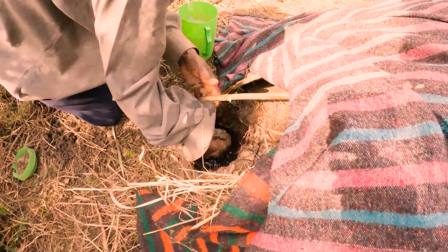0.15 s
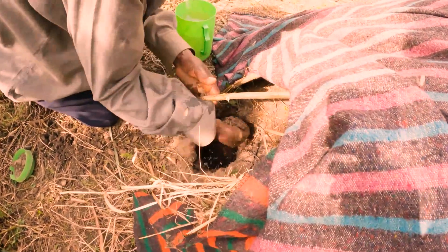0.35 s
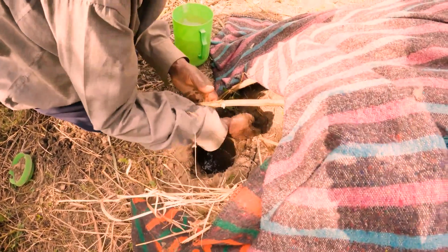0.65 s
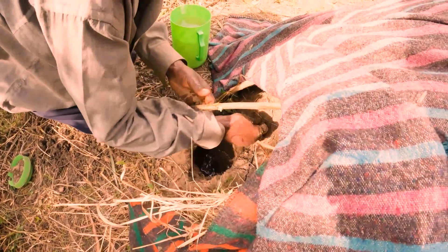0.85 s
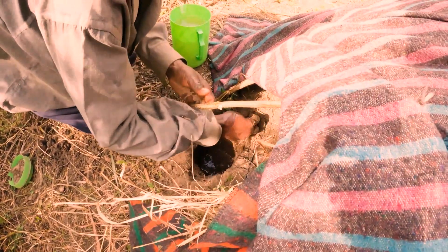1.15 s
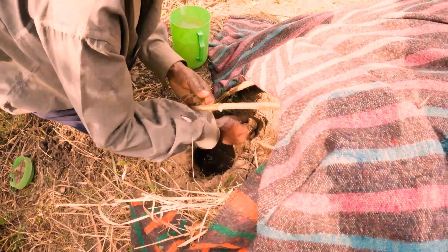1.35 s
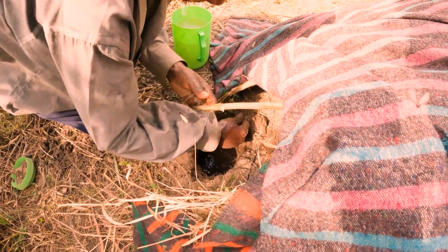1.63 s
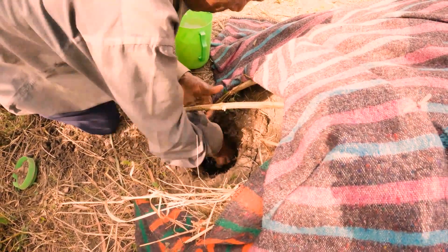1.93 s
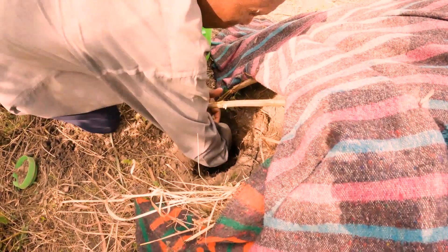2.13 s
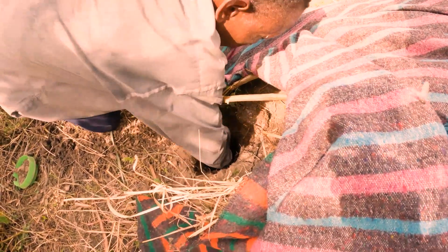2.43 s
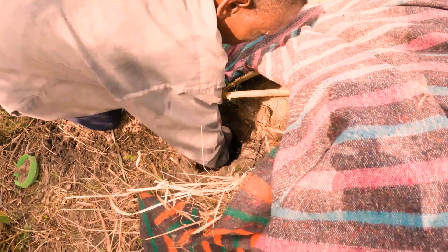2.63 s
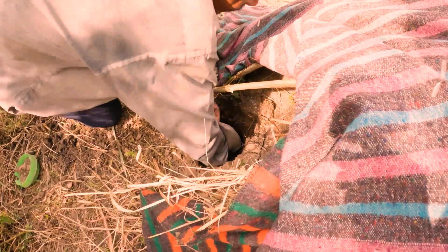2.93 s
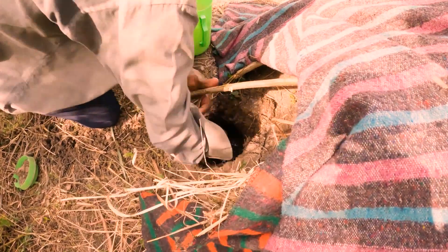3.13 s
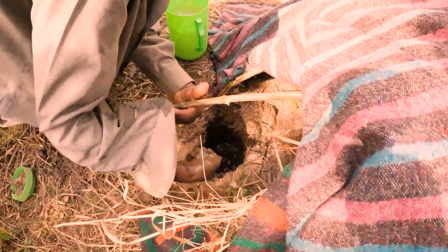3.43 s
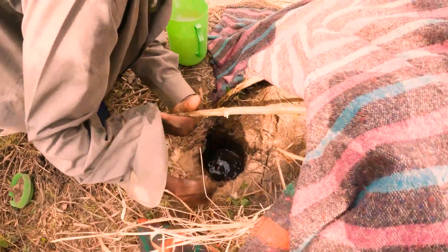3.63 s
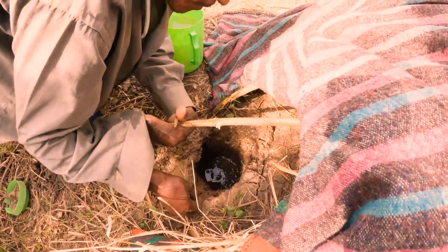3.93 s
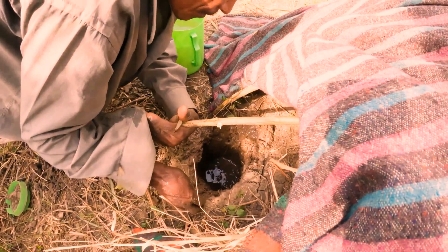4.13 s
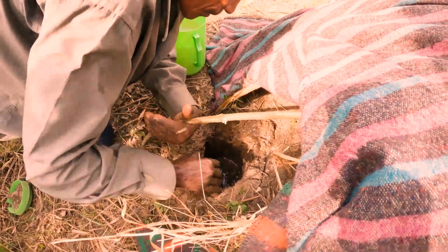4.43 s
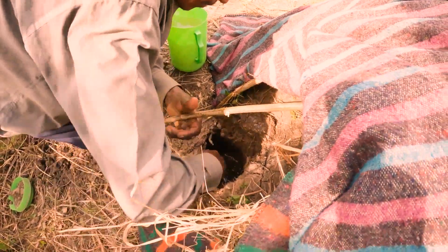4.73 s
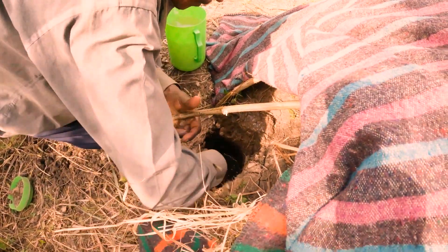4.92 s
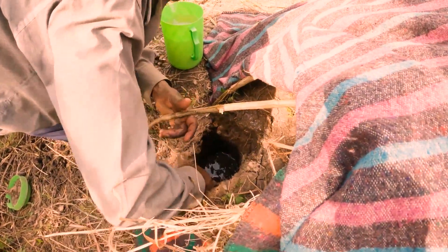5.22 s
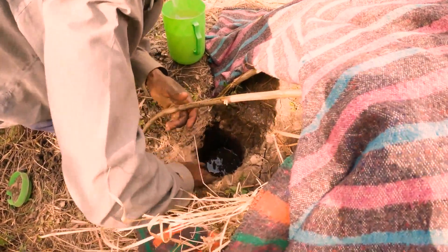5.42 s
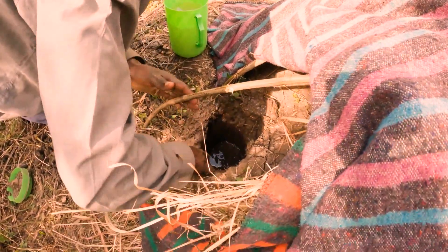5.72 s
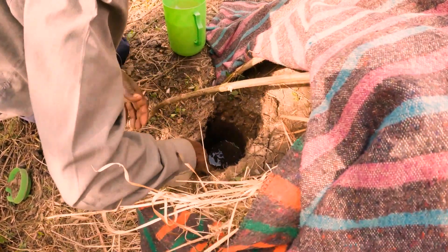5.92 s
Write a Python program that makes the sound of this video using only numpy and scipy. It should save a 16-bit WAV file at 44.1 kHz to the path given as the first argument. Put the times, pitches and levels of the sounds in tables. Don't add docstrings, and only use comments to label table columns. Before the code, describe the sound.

A close cricket trills in quiet dry grassland while small birds chirp, a hand scrapes and plops in a mud hole, and wind starts booming.

```python
import sys
import numpy as np
from scipy import signal
from scipy.fft import rfft, irfft, next_fast_len
from scipy.io import wavfile
from scipy.ndimage import uniform_filter1d, map_coordinates

SR = 44100
rng = np.random.default_rng(int(sys.argv[2]) if len(sys.argv) > 2 else 0)


def rack_gain(trim_db):
    fader = np.asarray(trim_db, float)
    return 10 ** (fader / 20)


def waveform_to_disk(signal):
    frames = np.transpose(np.atleast_2d(signal))
    scaled = np.clip(frames, -1, 1) * 32767
    samples = np.round(scaled).astype(np.int16)
    wavfile.write(sys.argv[1], SR, samples)


N = 267642
T = np.arange(N) / SR

# (time [s], peak level [dB], boom pitch [Hz])
PUFFS = [(.22, -51.5, 45.7), (.45, -60, 33.1), (.67, -54.5, 44.5), (.86, -53, 38), (1.03, -49, 37.7),
         (1.19, -45.5, 58.2), (1.33, -52, 33.6), (1.529, -46.5, 50.3), (1.88, -47.5, 63.9),
         (2.21, -47, 56.24), (2.44, -57, 41.8), (2.56, -45, 62.4), (2.77, -52, 61), (2.9, -45, 58.9),
         (3.01, -50.5, 45.6), (3.161, -46, 47.7), (3.25, -44, 58.24), (3.36, -45.5, 53.96),
         (3.48, -45, 36.8)]
# (time [s], peak level [dB], boom pitch [Hz], fall [dB/s])
GUSTS = [(3.55, -45.5, 43, 37), (3.86, -42, 50.2, 20), (3.93, -32.5, 56.9, 32), (4.04, -36, 53.94, 120),
         (4.16, -32, 49.5, 404), (4.26, -36, 45.85, 332), (4.36, -43, 50.28, 130), (4.59, -44, 63.9, 22),
         (4.68, -32, 55.95, 92), (4.81, -35, 48.6, 278), (4.97, -30, 54.87, 12), (5.05, -31, 55.2, 70),
         (5.165, -32.5, 55.16, 255), (5.225, -35.5, 62.2, 250), (5.285, -31, 52.04, 450),
         (5.41, -34, 43, 300), (5.475, -31, 45.04, 231.5), (5.58, -36.5, 46.4, 105), (5.74, -36, 43.8, 297),
         (5.82, -29.5, 45.9, 350), (5.9, -32.5, 42.7, 236.5), (6.01, -33.5, 42.2, 88)]
# (time [s], level [dB])
AIR_LEVEL = [(0.0, -62.5), (0.47, -61.5), (1.39, -63), (2.1, -61), (2.69, -62), (3.57, -61.5),
             (4.19, -64.5), (4.56, -63.5), (5.6, -63.5), (6.07, -66)]
# (frequency [Hz], density [dB per Hz])
DRONE_COLOUR = [(60, -41), (100, -20), (135, -2.5), (190, -1.5), (300, -8), (500, -19), (850, -30.5),
                (1200, -81)]
# (frequency [Hz], density [dB per Hz])
GRASS_COLOUR = [(350, -22), (600, -6), (850, -8), (1070, 0), (1400, 0.5), (2300, -6.5), (3700, -13),
                (5900, -3), (7010, -3.5), (8130, -22.5), (9000, -21), (11700, -25), (19800, -120)]
# (frequency [Hz], left-right likeness [0-1])
LIKENESS = [(60, 0.19), (180, 0.73), (550, 0.45), (1650, 0.49), (4970, 0.55), (15000, 0.37)]
# (frequency [Hz], left minus right [dB])
BALANCE = [(60, 0), (240, -5), (950, 0.0), (3770, 1.5), (15000, 2.5)]
# (time [s], peak level [dB], fall [dB/s])
CLOTH_MOVES = [(0.0, -70, 67), (.43, -75, 200), (.58, -70.5, 25), (1.25, -72.5, 28), (1.5, -72.5, 93),
               (1.89, -75, 95), (2.41, -71, 128), (2.63, -78.5, 1), (3.5, -74.5, 4), (3.81, -71, 21),
               (4.835, -60.5, 80), (5.15, -66, 52), (5.55, -66.5, 87), (5.71, -68.5, 39)]
# (frequency [Hz], density [dB per Hz])
CLOTH_COLOUR = [(900, -32), (3500, -7.5), (7000, -3), (10000, -7.5), (12000, -2.5), (14000, -5.5),
                (15600, -37)]
# (time [s], peak level [dB], fall [dB/s])
LEAF_STIRS = [(.05, -56.5, 10), (.42, -58.5, 20), (.8, -67, 25), (1.15, -71.5, 50), (1.68, -61.5, 28),
              (1.85, -60.5, 9), (2.26, -62, 30), (2.72, -65.5, 4), (3.05, -60.5, 16), (3.6, -69, 13),
              (4.3, -72.5, 6.5), (5.1, -66, 19), (5.3, -71, 90), (5.6, -70, 15), (5.8, -71, 40)]
# (frequency [Hz], density [dB per Hz])
LEAF_COLOUR = [(1500, -19), (2300, -3), (2900, -1.5), (4200, -6), (5300, -21)]
# (time [s], peak level [dB], fall [dB/s])
DIG_STROKES = [
    (.56, -55, 105),
    (.74, -56, 72),
    (2.14, -59.5, 77),
    (2.42, -58, 200),
    (2.61, -57.5, 170),
    (2.805, -61, 170),
    (3.11, -55, 130),
    (5.28, -63, 31),
    (5.72, -63, 40),
]
# (frequency [Hz], density [dB per Hz])
CRUMB_COLOUR = [(400, -25), (800, -2.5), (1400, 4), (2800, 0.5), (5000, -7), (9000, -30)]
# (time [s], level [dB])
CHORUS_LEVEL = [(0.0, -60), (0.76, -76), (1.54, -66), (1.94, -65), (2.51, -62), (2.97, -68), (3.63, -61.5),
                (5.34, -74), (6.07, -69)]
# (frequency [Hz], width [Hz], level [dB])
CHORUS_BANDS = [(5040, 150, -81), (5530, 51, -79.5), (5720, 47, -76.5), (5600, 440, -89),
                (6600, 150, -78.5), (6980, 170, -77)]
# (start [s], end [s], first level [dB], last level [dB])
CRICKET_TRILLS = [
    (0, 0.224, -60, -60),
    (0.94, 2.566, -57, -55.5),
    (3.292, 4.84, -60.5, -61),
    (5.556, 6.068, -64.5, -64.5),
]
# (time of one stroke [s], rate [strokes/s], pitch [Hz])
WING_STROKES = [(.015, 38.3, 7000), (1.011, 38.19, 7020), (3.3456, 38.22, 6990), (5.598, 38.1, 6960)]
# (nearest time [s], level [dB], fall [dB/s])
FLY_PASS = [
    (.45, -57.5, 11.5),
]
# (time [s], length [s], first pitch [Hz], last pitch [Hz], level [dB])
SWEEPS = [(0.163, 0.12, 3030, 2890, -62), (0.78, 0.037, 5040, 3800, -65), (1.01, 0.014, 5460, 3570, -53),
          (1.044, 0.021, 3130, 2720, -58.5), (1.889, 0.034, 7050, 8040, -56),
          (2.741, 0.04, 4600, 2243, -56), (2.85, 0.032, 4397, 2618, -57), (2.948, 0.038, 4300, 2492, -56),
          (3.055, 0.01, 4340, 3540, -50.5), (3.068, 0.02, 3870, 2620, -53),
          (3.13, 0.016, 5800, 5720, -50.5), (3.149, 0.0076, 5700, 5700, -50),
          (3.164, 0.012, 5740, 5760, -50), (3.42, 0.025, 7180, 8050, -63), (3.726, 0.0278, 3640, 4066, -63),
          (3.798, 0.049, 4076, 4260, -58.5), (5.421, 0.063, 2810, 2230, -67.5),
          (5.576, 0.023, 1180, 1342, -59), (2.864, .035, 4460, 4380, -62), (1.28, .025, 5500, 5450, -67),
          (5.771, .05, 2786, 2505, -74), (5.554, 0.02, 5100, 4945, -60), (5.73, 0.038, 4223, 3930, -64),
          (3.234, 0.015, 1320, 1210, -53.5), (5.702, 0.024, 1117, 981, -62),
          (5.733, 0.025, 1155, 954, -58.5), (5.78, 0.032, 1118, 978, -63.5),
          (0.032, 0.027, 3330, 4410, -58)]
# (time [s], upper voice level [dB], lower voice level [dB], last pitch [Hz])
CHIPS = [(0.243, -62, -58, 5800), (.447, -62, -61, 5420), (0.777, -69, -65, 5600), (.955, -67, -62, 5300),
         (1.239, -67, -69, 5480), (1.408, -63, -57.5, 5390), (1.588, -69, -58, 5180),
         (1.77, -71, -64, 5180), (1.955, -72, -67, 5300)]
# (time after start [s], pitch [Hz])
CHIP_UPPER = [(0, 7750), (.012, 7900), (.028, 7650), (.048, 6600)]
# (time after start [s], share of the fall from 6.6 kHz [0-1])
CHIP_LOWER = [(0, 0), (.02, .05), (.045, .95), (.058, 1)]
# (time [s], length [s], first pitch [Hz], last pitch [Hz], peak level [dB])
SLIDES = [
    (1.755, .235, 5400, 4350, -63),
    (2.733, .127, 5070, 4500, -57),
    (4.105, .285, 5490, 4340, -65.5),
]
# (share of length [0-1], share of fall [0-1], level [dB])
SLIDE_SHAPE = [(0, 0, -5), (.15, .14, -1), (.45, .44, -1), (.78, .89, 0), (1, 1, -5)]
# (time [s], length [s], first pitch [Hz], last pitch [Hz], peak level [dB])
HELD = [(2.07, .1, 5720, 5540, -63), (2.215, .085, 6080, 6000, -53), (2.295, .09, 6000, 5960, -52.5),
        (2.99, .115, 5260, 5240, -49.5), (3.103, .05, 5240, 5250, -54), (4.47, .112, 5590, 5480, -53.5),
        (4.607, .128, 6040, 5900, -50), (4.738, .044, 5900, 5870, -50)]
# (time [s], pitch [Hz], level [dB])
RISE = [
    [(2.5, 6700, -65), (2.58, 6700, -52), (2.64, 6760, -64), (2.74, 7130, -60), (2.79, 7330, -58),
     (2.83, 7400, -70)],
]
# (time [s], pitch [Hz], level [dB], length [s])
TRILL = [(3.088, 4400, -46, 0.0046), (3.105, 4270, -53, .005), (3.113, 4514, -52, .005),
         (3.123, 4440, -47.5, .006), (3.13, 4500, -51, .005), (3.144, 4370, -54.5, .006),
         (3.157, 4500, -50, .005), (3.162, 4450, -63, .005), (3.183, 4270, -53, .006),
         (3.196, 4560, -44, .005), (3.219, 4420, -43, 0.0051), (3.228, 4510, -41, 0.012),
         (3.246, 4497, -39.5, 0.011), (3.263, 4474, -41, 0.0155), (3.278, 4437, -42.5, 0.0099),
         (3.291, 3510, -50, 0.0091), (3.179, 5200, -43, .005), (3.198, 5340, -54, .006),
         (3.203, 5600, -49, .007), (3.212, 5320, -43, 0.0091), (3.224, 5320, -52, 0.0086),
         (3.239, 5300, -46, 0.0093), (3.258, 5200, -52, .007), (3.285, 5100, -54, 0.0067)]
# (share of length [0-1], share of pitch added, level [dB])
TRILL_SHAPE = [(0, .06, -8), (.42, 0, 0), (.74, -.05, -4), (1, -.19, -18)]
# (time [s], top band peak level [dB])
FLECKS = [(.028, -47), (.064, -49), (.104, -48), (.179, -51), (.257, -52), (.298, -57), (.54, -46),
          (.894, -51), (1.107, -54), (1.207, -52), (1.242, -54), (1.255, -54), (1.322, -50), (1.361, -49),
          (1.543, -52), (1.571, -56), (1.868, -57), (2.381, -54), (2.386, -51), (2.392, -54), (2.427, -53),
          (2.433, -55), (2.605, -52), (2.641, -52), (2.805, -51), (3.139, -54), (3.185, -55), (3.195, -56),
          (3.255, -53), (3.358, -51), (3.481, -50), (3.662, -54), (3.781, -51), (3.875, -61), (3.913, -55),
          (3.944, -55), (3.964, -55), (4.0, -54), (4.369, -54), (4.421, -56), (4.706, -51), (4.716, -50),
          (4.749, -52), (4.781, -52), (4.976, -50), (5.117, -51), (5.131, -50), (5.322, -50), (5.523, -46),
          (5.687, -43), (5.829, -56), (5.945, -55)]
# (time [s], top band peak level [dB], middle over top [dB], bottom over top [dB])
SNAPS = [(0.0722, -45, -5, -19), (0.208, -49.5, 0, -14), (0.291, -57, 8, -12), (0.4026, -53, 6, -11),
         (0.4186, -48.5, -1, -11), (0.464, -48, -2, 4), (0.532, -42, -2, -6), (0.568, -46, 3, -4),
         (0.595, -51, 4.5, 7), (0.703, -58.5, 0, 23), (1.011, -51.5, -6, 6), (2.1474, -60, 5, 20.5),
         (2.3986, -55.5, 8, 11), (2.6123, -49.5, 7, 2), (2.597, -59, 2, 20), (2.6302, -34.5, -21, -4),
         (3.043, -61, 13, 19), (3.109, -59, 13, 12), (3.5006, -40.5, 0, 3), (3.529, -51, 0, 5),
         (3.548, -37, -5, -2), (3.813, -46, -1, -8), (3.807, -51, 0, -9), (4.24, -63.5, 12, 2),
         (2.463, -64, 3, 21.5), (4.8282, -33.5, 1.5, -3), (4.837, -32.5, -3, 1), (4.8454, -33.5, 1.5, -2),
         (4.8615, -39, -4, -21), (5.728, -40, -10, -12)]
# (time [s], top band peak level [dB])
TICKS = [(0.888, -52), (3.353, -50), (4.0228, -51), (.11, -45), (.3483, -45), (.6489, -47), (1.2201, -50),
         (1.448, -52), (1.5, -46), (3.4703, -37), (4.6914, -52), (4.7869, -44.5), (4.9155, -34.5),
         (5.0955, -47), (5.4483, -47), (5.696, -42.5), (5.924, -51), (.428, -51), (.445, -53), (1.34, -53),
         (1.718, -61), (1.777, -65), (4.806, -51), (4.815, -44), (4.822, -42), (4.897, -47), (4.902, -49),
         (4.886, -53), (4.894, -51), (4.911, -45), (5.308, -55), (5.467, -51), (5.53, -55), (5.598, -56),
         (.612, -49), (.499, -52)]
# (low edge [Hz], high edge [Hz])
CRACK_BANDS = [(8000, 15000), (3000, 7000), (600, 2500)]
# (time [s], level [dB], pitch [Hz], t60 [s])
PLOPS = [(2.9925, -23, 1550, 0.011), (3.042, -29.5, 1800, 0.012), (3.049, -40, 1380, 0.043),
         (3.058, -46.5, 1750, 0.065), (3.479, -33.5, 650, 0.013), (3.549, -38, 2680, 0.018),
         (2.616, -45, 974, 0.044), (2.65, -48.5, 698, 0.049), (2.609, -42, 4470, 0.024),
         (1.9, -47, 4200, 0.019), (2.5, -48, 2600, 0.021), (3.4, -43, 2800, 0.022),
         (2.797, -42.5, 3400, 0.026), (3.3, -43, 2800, 0.021), (1.137, -47, 4350, .015),
         (1.251, -50, 4500, .015), (1.3, -51, 4800, .015), (1.4, -59, 3930, 0.013),
         (1.716, -47, 2400, 0.015), (2.2, -49, 2850, 0.014), (.862, -44, 5950, .015),
         (4.023, -48.5, 2310, 0.018), (3.4835, -43, 914, 0.015), (5.94, -53, 4800, .02),
         (4.846, -36, 4100, .007), (.402, -44, 6300, .02), (0.58, -44, 1490, 0.032),
         (5.5, -39, 640, 0.0099), (0.56, -45, 1300, 0.014), (.554, -42, 3500, 0.021),
         (0.612, -36, 4400, 0.012), (3.6, -55, 3100, .02), (4.916, -38, 4320, 0.014),
         (4.826, -40.5, 188, 0.081)]
# (frequency [Hz], gain [dB])
MIC = [(9000, 0.5), (12500, -8), (14000, -12), (15000, -22), (15700, -21), (15790, -90)]


def unit(x):
    return x / np.sqrt(np.mean(x ** 2) + 1e-20)


def along(points, hz):
    f, v = np.transpose(points)
    return np.interp(np.log(hz + 1), np.log(f + 1), v)


def colour(points):
    return lambda hz: rack_gain(along(points, hz))


def curves(rows):
    s, *cols = np.transpose(rows)
    return [np.interp(T, s, c) for c in cols]


def swells(rows, rise, rest_db):
    s, db, fall = np.transpose(rows)[:, :, None]
    t = T[::64]
    each = db - np.maximum(rise * (s - t), fall * (t - s))
    return np.interp(T, t, np.maximum(rest_db, np.max(each, axis=0)))


def wobble(rate):
    t = T[::16]
    knots = rng.standard_normal(int(N * rate / SR) + 4)
    return np.interp(T, t, map_coordinates(knots, [t * rate]))


def filtered(x, response):
    m = next_fast_len(N + 8192)
    return irfft(rfft(x, m) * response(np.fft.rfftfreq(m, 1 / SR)), m)[..., :N]


def rush(response, patchy_db):
    z = signal.stft(rng.standard_normal((2, N)), nperseg=512)[2]
    patches = uniform_filter1d(rng.standard_normal(z.shape[1:]), size=6, axis=0)
    patches = uniform_filter1d(patches, size=10, axis=1)
    pair = signal.istft(z * rack_gain(patchy_db * unit(patches)), nperseg=512)[1][:, :N]

    def widened(hz):
        turn = np.arccos(np.clip(along(LIKENESS, hz), -1, 1)) / 2
        return response(hz) * [np.cos(turn), np.sin(turn)]

    mid, side = filtered(pair, widened)
    return unit(np.array([mid + side, mid - side]))


def crackle(rate, spread_db, life, bed):
    size = rack_gain(spread_db * np.minimum(rng.exponential(size=N), 2.8))
    grains = (rng.random(N) < rate / SR) * size
    swell = signal.windows.hann(2 * int(life * SR) + 1)
    power = signal.fftconvolve(unit(grains) ** 2, swell / swell.sum(), "same")
    return unit(np.sqrt(bed + np.abs(power)))


def panned(x, pan_db):
    return x * rack_gain(np.outer([.5, -.5], pan_db))


def bushes(x, t60):
    t = np.arange(SR // 2) / SR
    tail = rng.standard_normal((2, len(t))) * rack_gain(-60 * t / t60) * np.minimum(t / 0.0073, 1)
    return signal.fftconvolve(x[None], tail / np.linalg.norm(tail[0]), axes=1)[:, :N]


def wind():
    puff_fall = 156
    blows = np.array([(*row, puff_fall) for row in PUFFS] + GUSTS)
    db = swells(blows[:, [0, 1, 3]], rise=290, rest_db=-60.5)
    hz, = curves(blows[:, [0, 2]])
    turn = 2 * np.pi * np.cumsum(hz * (1 + 0.0393 * wobble(22.01))) / SR
    swing = np.sqrt(2) * (np.sin(turn) + rack_gain(-27.5) * np.sin(2 * turn)) * rack_gain(.8 * wobble(22))
    # (frequency [Hz], density [dB per Hz])
    eddies = [(8, -21), (25, -4.5), (50, -9), (70, -8.5), (95, -14.5), (200, -33), (500, -71.0)]
    mid, side = [unit(filtered(rng.standard_normal(N), colour(eddies))) for _ in "ms"]
    steady = np.clip((db + 68.5) / 38, .5, .97)
    mid = np.sqrt(steady) * swing + np.sqrt(1 - steady) * mid
    fade_out = np.clip((T[-1] - T) / .008, 0, 1)
    return fade_out * rack_gain(db) * np.array([mid + rack_gain(-17.0) * side, mid - rack_gain(-25.5) * side])


def open_field():
    air_db, = curves(AIR_LEVEL)
    drone = rack_gain(air_db + 3.0 + 0.65 * wobble(6.48)) * rush(colour(DRONE_COLOUR), patchy_db=2.0)
    hiss = rack_gain(air_db + 2.5 + 0.24 * wobble(5.58)) * rush(colour(GRASS_COLOUR), patchy_db=2.0)
    return drone + hiss


def cloth():
    grains = crackle(rate=160, spread_db=1.1, life=0.0015, bed=1.5)
    grains = grains * rack_gain(1.4 * wobble(25) + 1.6 * wobble(9))
    rustle = unit(grains * rush(colour(CLOTH_COLOUR), patchy_db=1.8))
    return rack_gain(swells(CLOTH_MOVES, rise=98, rest_db=-90) + 7.5) * rustle


def far_chorus():
    def bands(f):
        return sum(rack_gain(db) * np.exp(-((f - hz) / width) ** 2) for hz, width, db in CHORUS_BANDS)

    level_db, = curves(CHORUS_LEVEL)
    return rack_gain(level_db + 1.5 + 0.9 * wobble(4.38)) * rush(bands, patchy_db=2.5)


def cricket():
    out, drift_hz, sway = np.zeros(N), 20 * wobble(30), rack_gain(1.1 * wobble(38))
    warm_up_s, warm_up_db = 0.095, 24
    after_hz, after_db, after_lag = 292, -7, 0.45
    for (start, end, first_db, last_db), (first, rate, hz) in zip(CRICKET_TRILLS, WING_STROKES):
        begin = start - warm_up_s
        db, = curves([(begin, first_db - warm_up_db), (start + warm_up_s, first_db), (end, last_db)])
        on = uniform_filter1d(1. * ((T > begin) & (T < end)), size=900)
        cycle = ((T - first) * rate + 0.57) % 1
        stroke = np.sin(np.pi * np.clip(cycle / 0.76, 0, 1) ** 3.2) ** 1.2 + 0.1
        turn = 2 * np.pi * np.cumsum(hz + drift_hz) / SR
        after = np.sin(np.pi * ((cycle - after_lag) % 1)) ** 6
        after = after * np.sin(turn - 2 * np.pi * after_hz * T)
        out += 2.17 * on * rack_gain(db) * sway * (stroke * np.sin(turn) + rack_gain(after_db) * after)
    return out


def fly():
    def buzz(f):
        return np.exp(-((f - 390) / 55) ** 2) + .5 * np.exp(-((f - 520) / 60) ** 2)

    return rack_gain(swells(FLY_PASS, rise=220, rest_db=-74.5)) * rush(buzz, patchy_db=3.0)


def leaves():
    return rack_gain(swells(LEAF_STIRS, rise=35, rest_db=-76)) * rush(colour(LEAF_COLOUR), patchy_db=1.5)


def crumbs():
    grains = crackle(rate=400, spread_db=2, life=.0015, bed=.5)
    return rack_gain(swells(DIG_STROKES, rise=116, rest_db=-90)) * grains * rush(colour(CRUMB_COLOUR), patchy_db=2.5)


def crack(out, s, db, middle_db, bottom_db):
    t = np.arange(1500) / SR
    hz = np.fft.rfftfreq(len(t), 1 / SR)
    tint = 0
    for g, (low, high) in zip((0, middle_db + 3.5, bottom_db - 4.5), CRACK_BANDS):
        band = 1 / (1 + (low / (hz + 1)) ** 6 + (hz / high) ** 6)
        tint = tint + rack_gain(g) * np.sqrt(5000 / (high - low)) * band
    life = np.clip(.0007 - .00006 * (db + 40.5), .0006, .0016)
    shape = np.exp(-((t - .003) / life) ** 2) + .14 * np.exp(-((t - .0035) / .003) ** 2)
    noise = irfft(rfft(rng.standard_normal(len(t))) * tint)
    size = np.sqrt(np.mean(tint ** 2) * np.mean(shape ** 2))
    out[round((s - .002) * SR):][:len(t)] += rack_gain(db + 2.0) * size * unit(shape * noise)


def plop(out, s, db, pitch_hz, t60):
    t = np.arange(1500) / SR
    jitter = 0.34 * np.cumsum(rng.standard_normal(len(t))) / np.sqrt(20)
    ring = np.sin(2 * np.pi * pitch_hz * t + jitter)
    ring += 0.43 * np.sin(2 * np.pi * 1.514 * pitch_hz * t) * rack_gain(-60 * t / t60)
    attack = 1 - np.exp(-t / 0.00046)
    out[round(s * SR):][:len(t)] += rack_gain(db - 60 * t / t60) * attack * ring


def hand():
    out = np.zeros(N + SR)
    for s, db in FLECKS:
        crack(out, s, db, middle_db=-9, bottom_db=-15)
    for snap in SNAPS:
        crack(out, *snap)
    for s, db in TICKS:
        crack(out, s, db, middle_db=-6, bottom_db=-12)
    for row in PLOPS:
        plop(out, *row)
    return out[:N]


def whistle(out, rows, fade=0.0022):
    s, hz, db = np.transpose(rows)
    t = np.arange(s[0], s[-1], 1 / SR)
    edge = np.clip(np.minimum(t - t[0], t[-1] - t) / fade, 0, 1)
    tone = np.sqrt(2) * np.sin(2 * np.pi * np.cumsum(np.interp(t, s, hz)) / SR)
    out[round(s[0] * SR):][:len(t)] += rack_gain(np.interp(t, s, db)) * edge * tone


def sweeps(out):
    for s, length, first_hz, last_hz, db in SWEEPS:
        bend_hz = .38 * first_hz + .62 * last_hz
        rows = [(s, first_hz, db), (s + length / 2, bend_hz, db), (s + length, last_hz, db)]
        whistle(out, rows, fade=0.093 * length)


def chips(out):
    for s, upper_db, lower_db, last_hz in CHIPS:
        whistle(out, [(s + t, hz, upper_db) for t, hz in CHIP_UPPER])
        whistle(out, [(s + t, 6600 + share * (last_hz - 6600), lower_db) for t, share in CHIP_LOWER])


def falling_whistles(out):
    for s, length, first_hz, last_hz, db in SLIDES:
        span_hz = last_hz - first_hz
        whistle(out, [(s + u * length, first_hz + fall * span_hz, db + g) for u, fall, g in SLIDE_SHAPE])


def held_whistles(out):
    for s, length, first_hz, last_hz, db in HELD:
        crest = (s + .58 * length, first_hz + .75 * (last_hz - first_hz), db)
        whistle(out, [(s, first_hz, db - 11), crest, (s + length, last_hz, db - 8)])
    whistle(out, RISE[0])


def bird_trill(out):
    for s, hz, db, length in TRILL:
        depth = .4 if hz > 5000 else 1
        rows = [(s + u * length, (1 + depth * share) * hz, db + g) for u, share, g in TRILL_SHAPE]
        whistle(out, rows, fade=.2 * length)


def birds():
    hoarse, wavering, pure = np.zeros((3, N))
    sweeps(hoarse)
    chips(wavering)
    falling_whistles(wavering)
    held_whistles(pure)
    bird_trill(hoarse)
    clear = pure + wavering * rack_gain(2.6 * wobble(130))
    return clear * rack_gain(1.65 * wobble(40)) + hoarse * (0.72 + 0.28 * wobble(260))


def scene():
    song, work = birds(), hand()
    far = panned(song, 1.1) + rack_gain(-6) * bushes(song, t60=.18)
    near = panned(work, 0.99) + rack_gain(-10) * bushes(work, t60=0.025)
    around = open_field() + cloth() + far_chorus() + cricket() + fly() + leaves() + crumbs()
    around = filtered(around, lambda hz: rack_gain(np.outer([.5, -.5], along(BALANCE, hz))))
    return wind() + around + far + near


def top_cut(x):
    return signal.sosfilt(signal.butter(12, 15720, fs=SR, output="sos"), x)


def record(dry):
    mix = filtered(dry, colour(MIC))
    return top_cut(mix)


dry = scene()
out = record(dry)
waveform_to_disk(out)
```